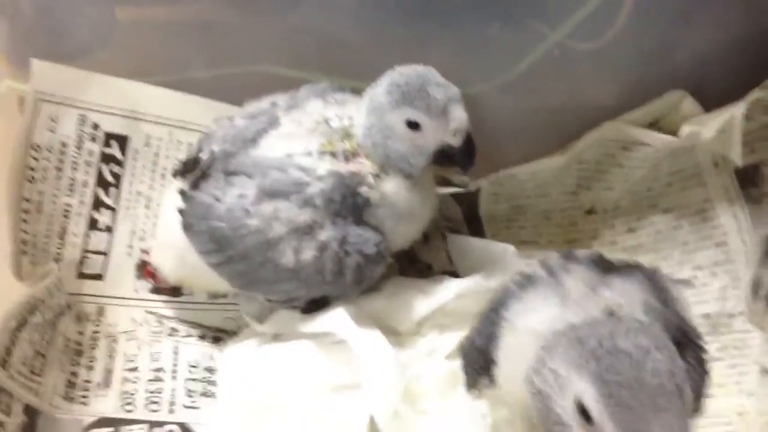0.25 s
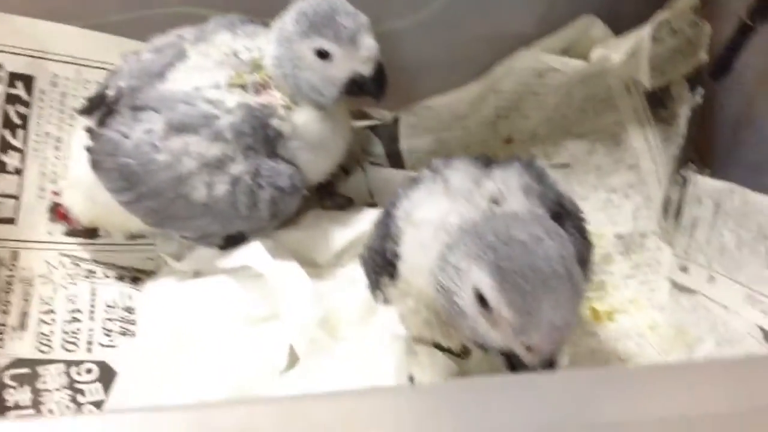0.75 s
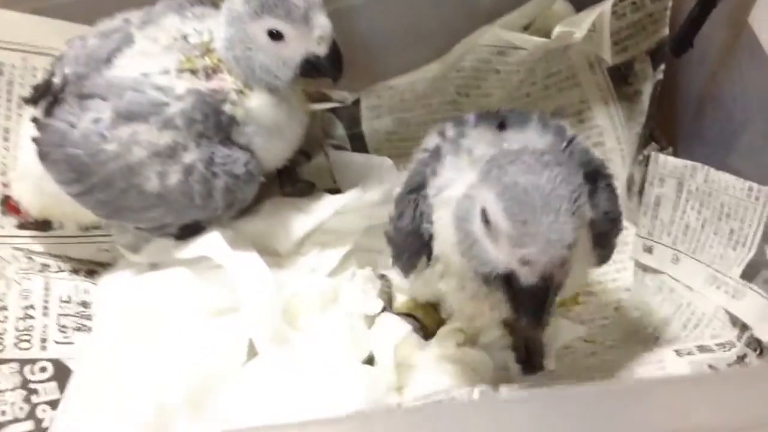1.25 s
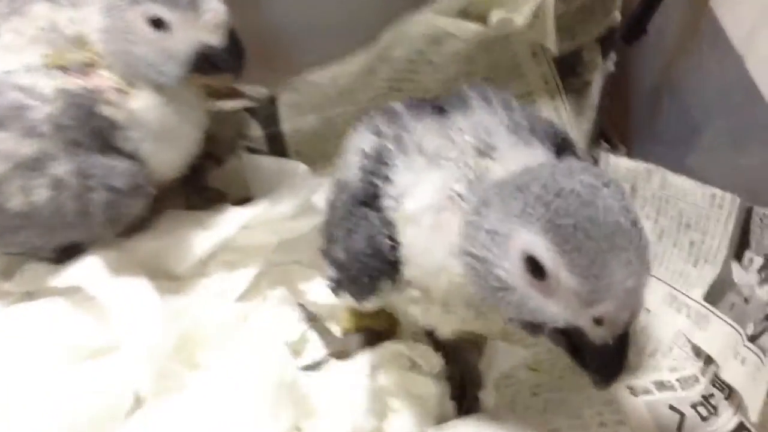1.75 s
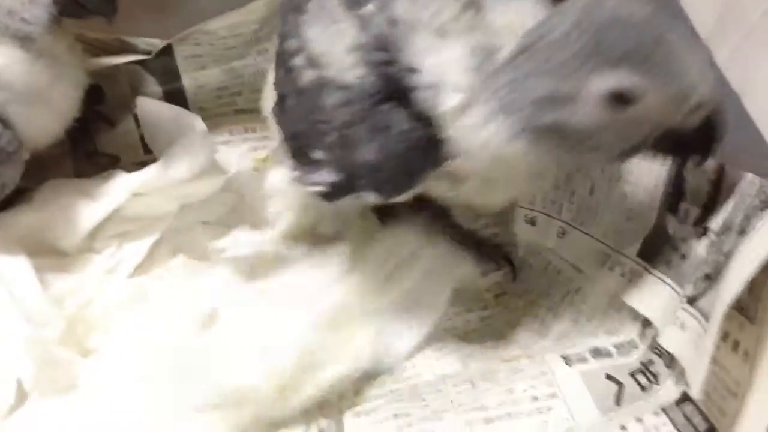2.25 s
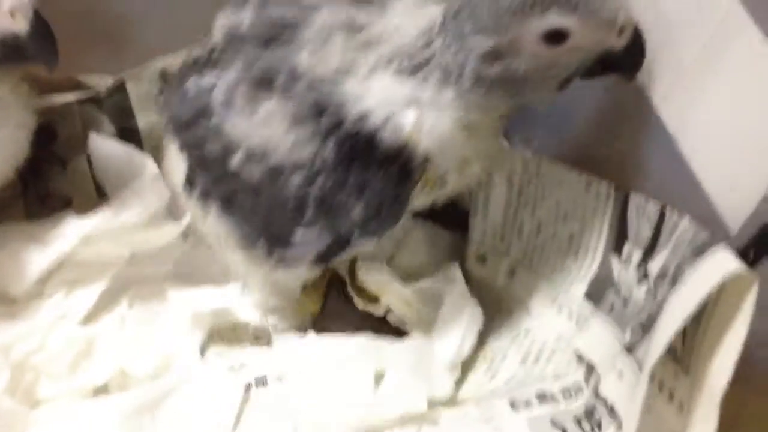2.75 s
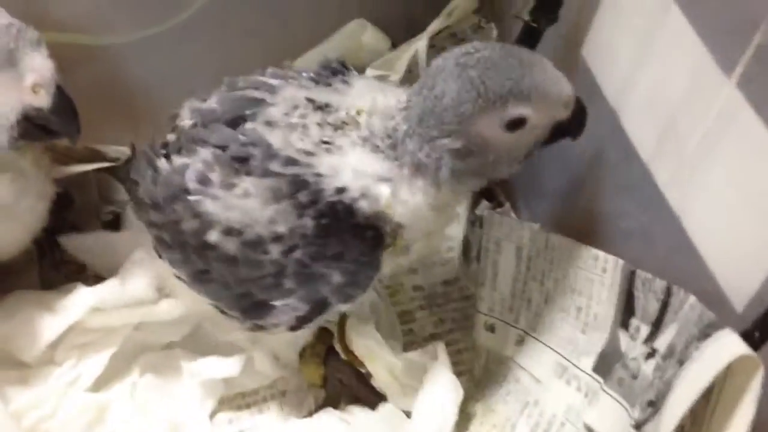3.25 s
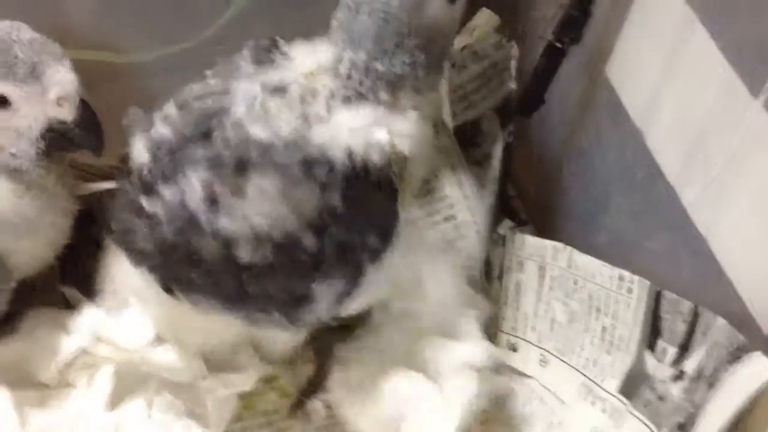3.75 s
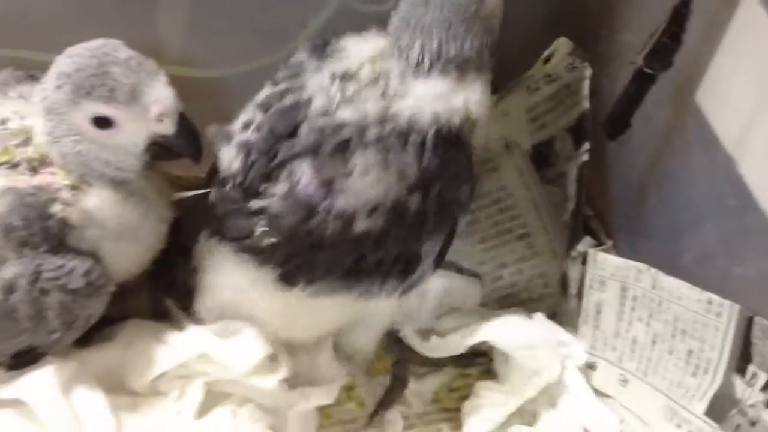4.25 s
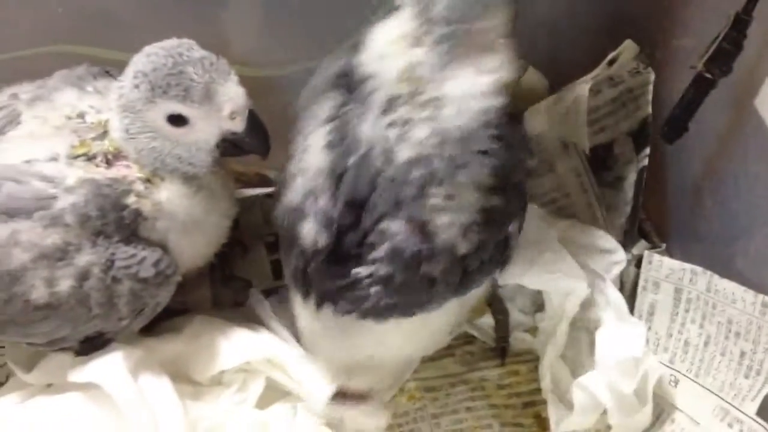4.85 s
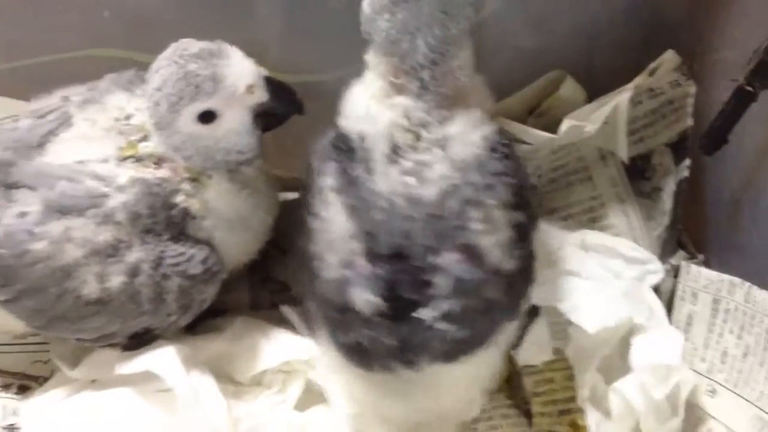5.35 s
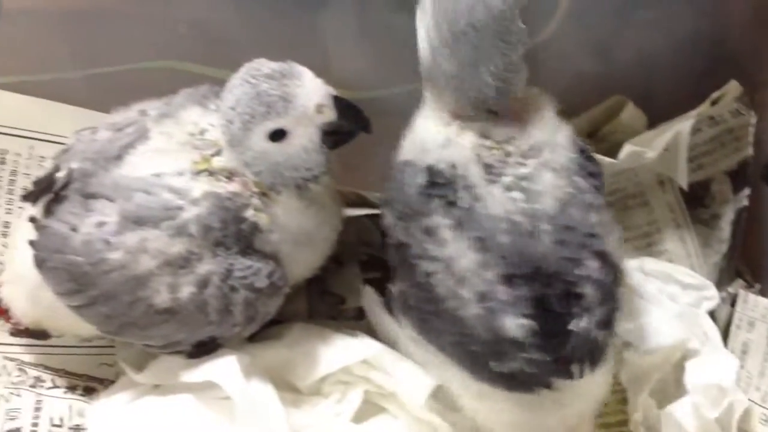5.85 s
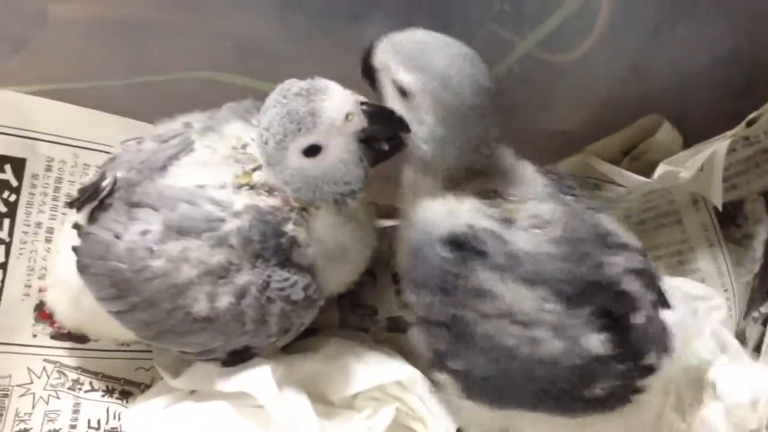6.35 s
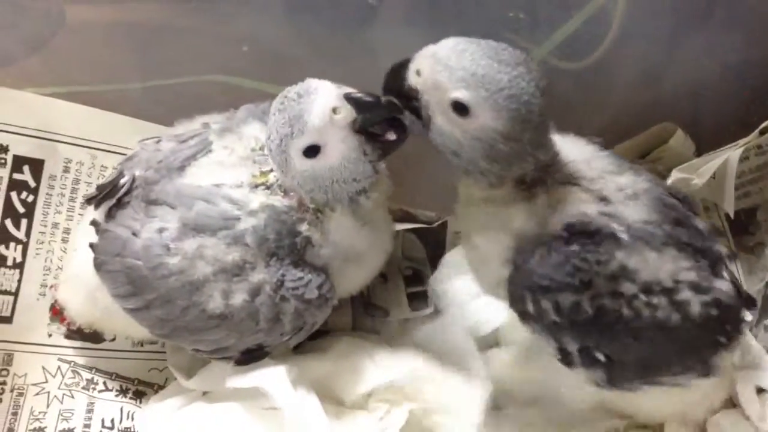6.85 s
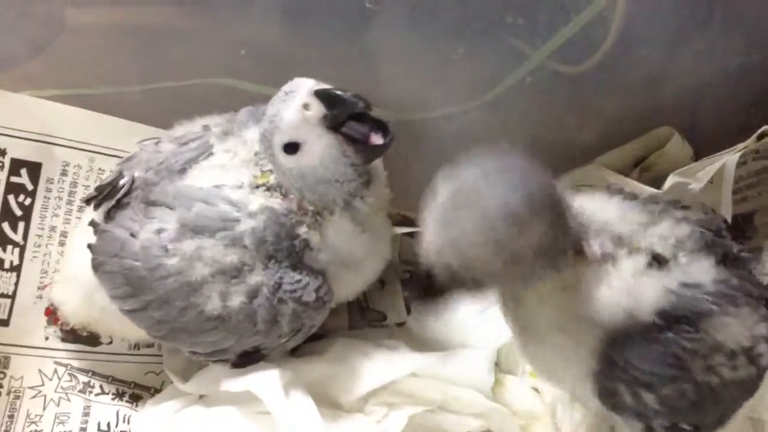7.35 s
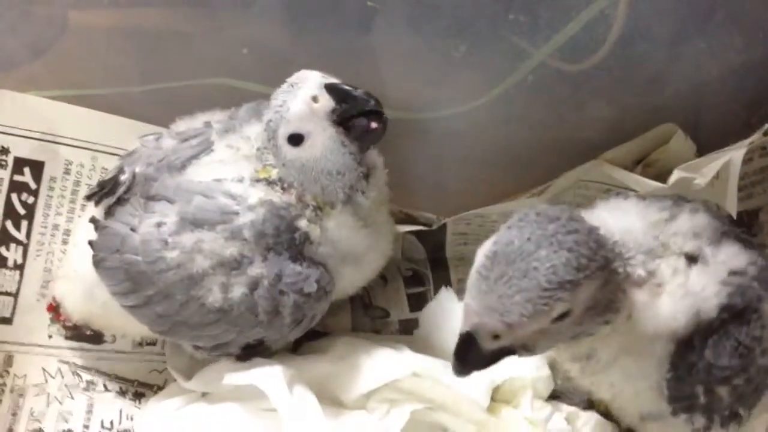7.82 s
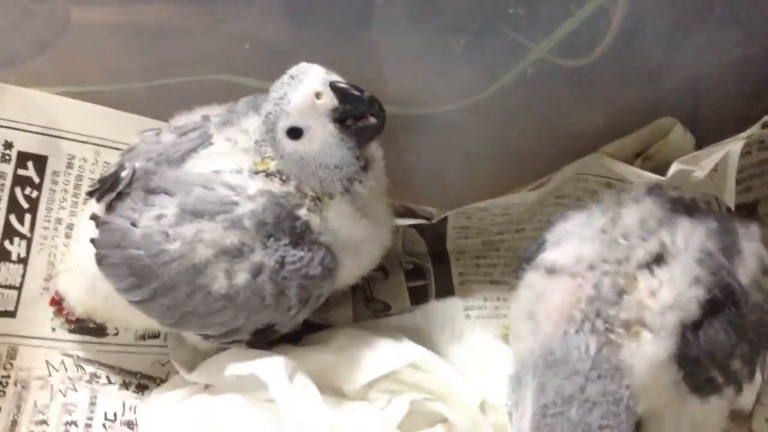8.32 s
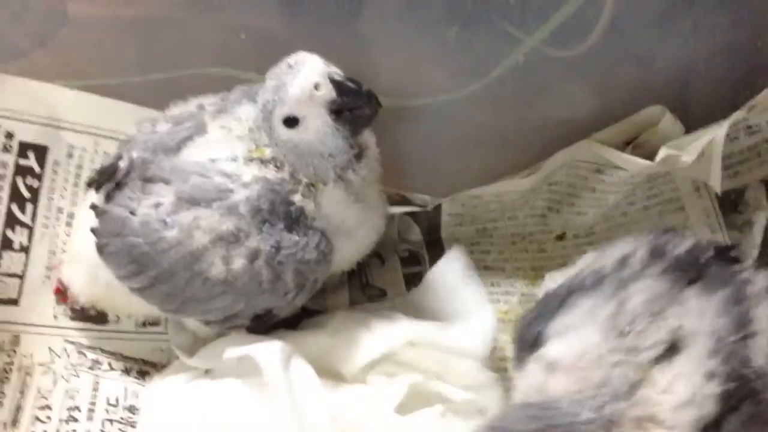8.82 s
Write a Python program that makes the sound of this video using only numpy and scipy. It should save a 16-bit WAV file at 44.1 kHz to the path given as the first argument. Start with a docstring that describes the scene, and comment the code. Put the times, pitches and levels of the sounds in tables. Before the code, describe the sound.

Claws tap, snap and scuff irregularly on newspaper in a plastic box, with soft floor thumps, tissue rustle and a faint low hum.

```python
"""Plastic box in a small room: parrot chicks shuffle over newspaper and tissue.
Claws tap and snap the paper: noise bursts plus a briefly ringing sheet. Feet thump the floor: damped modes.
Feathers and tissue rustle between the steps: tiny slips over smooth friction; dragged claws ring in bands.
Reflections and a short tail surround the chicks; swelling room air and a low, wavering hum lie beneath."""
import sys
import numpy as np
from scipy import signal
from scipy.fft import rfft, irfft
from scipy.io import wavfile

SR = 44100
rng = np.random.default_rng(int(sys.argv[2]) if len(sys.argv) > 2 else 0)


def bounce(signal):
    """Save signal as a 16-bit WAV file at the path given by the first command-line argument."""
    frames = np.transpose(np.atleast_2d(signal))
    limited = np.clip(frames, -1, 1)
    pcm = np.round(limited * 32767).astype(np.int16)
    wavfile.write(sys.argv[1], SR, pcm)


N = 400428
TIME = np.arange(N) / SR
FREQS = np.maximum(np.arange(N // 2 + 1) * SR / N, 1)
CUTOFF_HZ = 15700
SCUFF_BAND_HZ, CRACK_BAND_HZ, TICK_BAND_HZ = (428, 1380), (1497, 4650), (3760, 18500)


def from_db(db):
    """Decibels to gain."""
    return 10 ** (np.asarray(db) / 20)


def rms_one(x):
    """Scale to unit rms."""
    return x / np.sqrt(np.mean(x ** 2) + 1e-20)


def at_hz(points, hz):
    """Read a table on a log-frequency axis."""
    f, value = np.transpose(points)
    return np.interp(np.log(hz), np.log(f), value)


def band(edges_hz, order=8):
    """Gain of a band with smooth edges."""
    low, high = edges_hz
    return 1 / np.sqrt((1 + (low / FREQS) ** order) * (1 + (FREQS / high) ** order))


def shaped(x, gain):
    """Filter a steady signal by a spectral gain; rms 1."""
    return rms_one(irfft(rfft(x) * gain, N))


def drift(rate_hz):
    """Slow random signal with spread 1."""
    return shaped(rng.standard_normal(N), 1 / (1 + (FREQS / rate_hz) ** 2))


def ring(x, hz, t60_s):
    """Damped mode: a unit click starts a cosine of unit height."""
    radius = 10 ** (-3 / (t60_s * SR))
    angle = 2 * np.pi * hz / SR
    return signal.lfilter([.5, 0, -.5], [1, -2 * radius * np.cos(angle), radius * radius], x)


def add(out, start_s, sound):
    """Mix a sound in at a given time."""
    i = int(start_s * SR)
    out[i:i + len(sound)] += sound[:N - i]


# relative spectrum of paper inside the box: (frequency [Hz], density [dB per Hz])
PAPER_SPECTRUM = [(400, 0), (640, 10), (800, 0), (1150, 7), (1550, -1.5), (1900, 1), (2700, -6), (3400, -2),
                  (4100, -10.5), (5200, -16.5), (6700, -8.5), (8400, -3.5), (9800, -14), (15000, -14)]
# narrow peaks and dips from the box walls: (frequency [Hz], width [Hz], gain [dB])
WALL_RESONANCES = [(1105, 70, -6), (2670, 41, 8.5), (3450, 60, -7.5), (6530, 180, 0.5)]


def paper_colour():
    """Gain of the broad paper spectrum with the wall resonances on top."""
    level_db = at_hz(PAPER_SPECTRUM, FREQS)
    for hz, width_hz, gain_db in WALL_RESONANCES:
        level_db = level_db + gain_db / (1 + (2 * (FREQS - hz) / width_hz) ** 2)
    return from_db(level_db)


def paper_noise(edges_hz):
    """Noise with the colour of paper in the box, within one band."""
    return shaped(rng.standard_normal(N), paper_colour() * band(edges_hz))


# a foot or wing sweeps over the bedding; levels precede the band gains in shuffling():
# (start [s], length [s], level [dB], brightness [dB])
SWEEPS = [(0.843, 0.33, -55.5, -3.5), (0.958, 0.044, -48, -0.5), (1.307, 0.14, -64, 0),
          (1.519, 0.17, -54.5, 1.5), (1.87, 0.24, -54.5, 0), (1.965, 0.022, -58, 12), (2.196, 0.14, -53, 4),
          (2.351, 0.086, -40, 0), (2.438, 0.079, -51.5, 0), (2.528, 0.14, -58, -3.5),
          (2.789, 0.13, -50.5, 1.5), (2.937, 0.26, -51, 1), (3.496, 0.098, -58.5, -0.5),
          (3.607, .11, -51, 0), (3.719, 0.069, -52.5, 1), (3.794, 0.14, -60, 1), (3.972, 0.042, -48, -1.5),
          (4.091, 0.068, -54.5, -0.5), (4.338, 0.12, -49.5, 2), (4.465, 0.39, -56.5, -5),
          (4.967, 0.12, -49.5, -4), (5.182, 0.14, -51.5, 0.5), (5.902, 0.16, -57, 0.5),
          (5.968, .022, -48.5, 2), (6.054, .08, -57.5, -1), (6.228, 0.12, -55, 0), (6.658, 0.17, -67, 3),
          (6.864, 0.11, -54.5, 3), (7.122, 0.29, -61, 2), (7.419, 0.14, -56, 1), (7.646, 0.41, -58.5, 2.5),
          (8.058, 0.18, -57, 2.5), (8.328, 0.16, -51.5, 1.5), (8.712, .18, -58.5, 4),
          (8.825, 0.033, -46, -1.5), (9.001, 0.047, -49.5, -2)]
SNAG_EVERY_S, SNAG_SCATTER_DB, SNAG_HZ = 0.05, 2.5, 1000
SNAG_RING_DB, SNAG_CRACK_DB, SNAG_TICK_DB = -0.5, -2.5, -3.5  # re the sweep
TAP_DECAY_S = 0.0049  # up to TAP_DECAY_AT_DB; halves with every DECAY_HALVES_DB above it
TAP_DECAY_AT_DB, DECAY_HALVES_DB = -45.5, 15
SECOND_TOUCH_S = 0.0051
# claw taps and paper snaps: (time [s], ring frequency [Hz], ring level [dB], crack level [dB],
# tick level [dB], second touch re the first [dB])
CLAW_TAPS = [(0.577, 750, -55.5, -63, -80, -16), (0.716, 710, -54, -70, -66, -6),
             (0.982, 1490, -55, -48.5, -47.5, 2.5), (1.0504, 1020, -24.5, -30.5, -41, -4.5),
             (1.557, 980, -47, -64, -65, -16), (1.883, 630, -52.5, -77, -74, 2),
             (1.966, 1000, -45, -64, -52, -12), (2.0186, 587, -15.5, -23.5, -27, -14),
             (2.042, 920, -29.5, -41, -45, -19), (2.3536, 1020, -25.5, -33.5, -50, -15),
             (2.413, 1160, -24.5, -27.5, -28, -2), (2.6405, 3520, -42, -43.5, -57, -19),
             (2.674, 3640, -48.5, -63, -47.5, 2), (2.86, 3000, -37, -58, -44, -4),
             (2.8995, 2840, -40, -56, -54, -14), (3.017, 1340, -57, -37.5, -33, -8.5),
             (3.041, 1100, -56, -41, -50, -4), (3.0856, 1285, -34, -33, -38.5, 12.5),
             (3.095, 630, -25, -34, -46, -26), (3.105, 1090, -33, -32, -47, -23),
             (3.474, 1230, -47, -65, -72, -4), (3.675, 684, -51, -42.5, -54, -25),
             (3.835, 1080, -48, -66, -65, -14), (3.885, 1040, -48.5, -57, -62, -21),
             (4.0354, 1030, -31.5, -31.5, -30.5, -4.5), (4.0432, 1790, -23.5, -34, -33, -24),
             (4.0775, 1260, -45, -38, -43, -31), (4.333, 624, -40.5, -48.5, -67, -24),
             (4.409, 579, -28, -39.5, -45, -2), (4.664, 1110, -47, -64, -57, -10),
             (4.851, 920, -36.5, -33.5, -36.5, -9), (4.868, 1180, -44, -50, -41, -25),
             (4.89, 890, -34, -33.5, -30.5, 9), (4.8932, 6800, -20, -37, -42, -34),
             (5.2559, 630, -39.5, -44.5, -52, -1), (6.0348, 1190, -35, -29.5, -37, -4.5),
             (6.04, 6000, -27.5, -35, -37.5, -36), (6.107, 955, -46, -44, -63, -10),
             (6.123, 8000, -45.5, -59, -64, -27), (6.152, 806, -51, -52, -62, -10),
             (6.198, 8000, -52.5, -53, -54, -24), (6.346, 590, -31, -35, -44.5, -12),
             (6.357, 640, -34, -30.5, -44, -5.5), (6.431, 1160, -50.5, -50, -67, -30),
             (6.956, 1410, -41.5, -50, -47, -1.5), (7.475, 1140, -57, -51, -48, -22),
             (7.544, 575, -50, -55, -49, -19), (7.677, 540, -44.5, -56, -62, -0.5),
             (7.71, 7900, -49, -66, -64, -16), (8.4517, 1120, -29, -35, -38.5, 0),
             (8.832, 1290, -62, -38.5, -43, -5), (9.021, 1170, -48, -38.5, -51, -22)]


def touches(snags_per_sweep=8):
    """Each tap is two touches, harder ones shorter; claws also snag faintly along each sweep."""
    for s, hz, ring_db, crack_db, tick_db, second_db in CLAW_TAPS:
        for lag_s, db in ((0, 0), (SECOND_TOUCH_S, second_db)):
            force_db = max(ring_db, crack_db) + db
            decay_s = TAP_DECAY_S * .5 ** (max(force_db - TAP_DECAY_AT_DB, 0) / DECAY_HALVES_DB)
            yield s + lag_s, hz, ring_db + db, crack_db + db, tick_db + db, decay_s
    sweep_chances = rng.uniform(-1, 1, (len(SWEEPS), snags_per_sweep, 3))
    for (start_s, length_s, level_db, brightness_db), chances in zip(SWEEPS, sweep_chances):
        for k, (when, pitch, size) in enumerate(chances):
            after_s = (k + .5 + when / 2) * SNAG_EVERY_S
            db = level_db + SNAG_SCATTER_DB * size
            if after_s < length_s:
                yield (start_s + after_s, SNAG_HZ * 2 ** (pitch / 2), db + SNAG_RING_DB - brightness_db,
                       db + SNAG_CRACK_DB, db + SNAG_TICK_DB + brightness_db, TAP_DECAY_S / 2)


def taps(rise_s=0.0011, ring_cycles=13, body_cycles=1.96, tick_decay_ratio=0.83, tick_top_hz=10500):
    """Each tap is a burst of buckling fibres; the sheet under the claw rings briefly at its own pitch."""
    out, t = np.zeros(N), TIME[:SR // 25]
    attack = 1 - np.exp(-t / rise_s)
    body = paper_noise((SCUFF_BAND_HZ[0], CUTOFF_HZ))
    crack = paper_noise(CRACK_BAND_HZ)
    tick = shaped(paper_noise(TICK_BAND_HZ), 1 / np.sqrt(1 + (FREQS / tick_top_hz) ** 2))
    for s, hz, ring_db, crack_db, tick_db, decay_s in touches():
        here = (int(s * SR) + np.arange(len(t))) % N
        burst = attack * np.exp(-t / decay_s)
        sheet = ring(signal.unit_impulse(len(t)), hz, ring_cycles / hz) * attack
        body_t60_s = body_cycles / hz
        knock = ring(ring(body[here], hz, body_t60_s), hz, body_t60_s) * burst
        tone = rms_one(rms_one(knock) + rms_one(sheet))
        snap = rms_one(crack[here] * burst)
        edge = rms_one(tick[here] * attack * np.exp(-t / (decay_s * tick_decay_ratio)))
        tap = from_db(ring_db) * tone + from_db(crack_db) * snap + from_db(tick_db) * edge
        # each part's level is its energy spread over 5 ms, as rms
        add(out, s, tap * np.sqrt(SR / 200 / len(t)))
    return out


# box floor: (frequency [Hz], relative level [dB], t60 [s])
FLOOR_MODES = [(129, -14.5, 0.066), (183.3, -9, 0.13), (222.4, 1.5, 0.045), (324.3, 1, 0.062),
               (377, 3.5, 0.023), (473, -0.5, 0.028), (580, 5.5, 0.046), (630, -42, 0.04)]
# weight landing on the floor: (time [s], peak level before level_db [dB], contact time [s])
FOOTSTEPS = [(1.054, -38, 0.0032), (2.0190, -14, 0.00094), (2.025, -20, 0.0024), (2.354, -29, 0.0037),
             (2.419, -30, 0.0026), (3.0875, -16, 0.0014), (3.762, -36, 0.0045), (4.0462, -30.5, 0.0026),
             (4.3340, -40, 0.0019), (4.412, -17, 0.00127), (4.427, -29.5, .0038), (4.8910, -22, 0.0018),
             (5.2570, -28, 0.002), (6.0391, -28.5, 0.001), (6.3509, -10.5, 0.00057), (6.958, -33, 0.0033),
             (7.546, -19.5, 0.0015), (7.6761, -39, 0.0007), (8.177, -28.5, 0.0029), (8.8399, -35.5, 0.0042)]


def steps(level_db=0.5, scatter_db=1.5, radiation_hz=135, rock_db=-30.0):
    """A foot pushes the plastic floor with a half-sine; a soft, long contact favours the low modes."""
    out, t = np.zeros(N), TIME[:SR // 4]
    scatter = rng.standard_normal((len(FOOTSTEPS), len(FLOOR_MODES)))
    # a small panel radiates little bass
    radiation = signal.butter(3, radiation_hz, "high", fs=SR, output="sos")
    for (s, peak_db, contact_s), spot in zip(FOOTSTEPS, scatter):
        force = np.sin(np.pi * np.minimum(t / contact_s, 1))
        push = signal.sosfilt(radiation, force) + from_db(rock_db) * force  # the whole box rocks a little
        thump = np.zeros(len(t))
        for (hz, db, t60_s), own in zip(FLOOR_MODES, spot):
            thump += from_db(db + scatter_db * own) * ring(push, hz, t60_s)
        add(out, s, from_db(peak_db + level_db) * thump / np.abs(thump).max())
    return out


FIDGET_DB = -70  # the chicks never keep quite still
# trodden paper relaxes: level re the tap, amplitude decay time, brightness
SETTLE_DB, SETTLE_S, SETTLE_BRIGHTNESS_DB = -13.5, 0.013, -2
# share of its length at which a sweep is loudest; exponent of its arch; drop at start and end
SWEEP_CREST, SWEEP_ROUNDNESS, SWEEP_EDGE_DB = 0.61, 1.5, 9


def friction(tapping, lean):
    """Rubbing level [dB] of fidgets, sweeps and settling; brightness tilts low (-1) against high (+1)."""
    keep = np.exp(-2 / (SETTLE_S * SR))
    settling = signal.lfilter([1 - keep], [1, -keep], tapping ** 2 + 1e-18)
    power = from_db(FIDGET_DB) ** 2 + settling * from_db(SETTLE_DB + lean * SETTLE_BRIGHTNESS_DB) ** 2
    for start_s, length_s, db, brightness_db in SWEEPS:
        progress = np.arange(-1, 2, 1 / (length_s * SR))
        before = (SWEEP_CREST - progress) / SWEEP_CREST
        after = (progress - SWEEP_CREST) / (1 - SWEEP_CREST)
        drop_db = SWEEP_EDGE_DB * np.maximum(before, after) ** SWEEP_ROUNDNESS
        add(power, start_s - length_s, from_db(db + lean * brightness_db - drop_db) ** 2)
    return 10 * np.log10(power)


def grains(edges_hz, per_s, size_db, cycles, count=10):
    """Fibres let go at random; each pings for a few cycles at one of several pitches."""
    sizes = from_db(size_db * np.minimum(rng.exponential(1, N), 3)) * rng.choice([-1, 1], N)
    clicks = sizes * (rng.random(N) < per_s / SR)
    dealt = rng.integers(0, count, N)
    pitches = np.minimum(np.geomspace(*edges_hz, count), CUTOFF_HZ)
    faint = 1e-12 * rng.standard_normal(N)
    pings = np.zeros(N)
    for k, hz in enumerate(pitches):
        pings += hz ** .5 * ring(clicks * (dealt == k) + faint, hz, cycles / hz)
    return rms_one(pings)


def rustle(level_db, edges_hz, grains_per_s, size_db, cycles, smooth, flutter_db):
    """Tiny slips of uneven size over smooth friction, bunched as the contact catches and lets go."""
    slips = shaped(grains(edges_hz, grains_per_s, size_db, cycles), paper_colour() * band(edges_hz))
    rubbing = slips + smooth * paper_noise(edges_hz)
    return from_db(level_db) * rms_one(rubbing * from_db(flutter_db * drift(89)))


SCRAPE_DB, CRINKLE_DB, SWISH_DB = -6.5, -0.6, -0.7
CATCH_DB, CATCH_HZ = 0.72, 21.9  # the bedding catches and lets go unevenly


def shuffling(tapping):
    """Claws scuff, newspaper crinkles, feathers brush the tissue: slips over smooth friction."""
    catching_db = CATCH_DB * drift(CATCH_HZ)
    scrape_db, crinkle_db, swish_db = [friction(tapping, lean) + catching_db for lean in (-1, 0, 1)]
    scrape = rustle(scrape_db + SCRAPE_DB, SCUFF_BAND_HZ, grains_per_s=230, size_db=3.0,
                    cycles=9.1, smooth=0.87, flutter_db=1.5)
    crinkle = rustle(crinkle_db + CRINKLE_DB, CRACK_BAND_HZ, grains_per_s=300, size_db=2.5,
                     cycles=31, smooth=1.38, flutter_db=1.0)
    swish = rustle(swish_db + SWISH_DB, TICK_BAND_HZ, grains_per_s=300, size_db=4.0,
                   cycles=30, smooth=2.5, flutter_db=1.5)
    return scrape + crinkle + swish


# claws dragged across paper; an end before the loudest point cuts the drag off there:
# (start [s], loudest [s], end [s], centre [Hz], width [Hz], level [dB])
CLAW_DRAGS = [(0.963, 0.97, 1.06, 2300, 3020, -54), (0.93, .98, 0.97, 880, 500, -50.5),
              (1.525, 1.546, 1.9, 1000, 300, -61), (1.963, 1.96, 1.99, 1020, 150, -47.5),
              (2.771, 2.85, 2.87, 3200, 750, -47.5), (2.87, 2.892, 2.93, 3230, 600, -48),
              (4.623, 4.68, 4.85, 1140, 250, -61), (4.982, 5.06, 5.08, 490, 420, -45),
              (6.34, 6.37, 5.5, 586, 130, -61)]


def drags(chatter_db=3.0, chatter_hz=220):
    """A dragged claw sticks and slips; the patch of paper under it rings in one band."""
    out, chatter = np.zeros(N), from_db(chatter_db * drift(chatter_hz))
    slips = rng.standard_normal(N) * chatter
    for start_s, loudest_s, end_s, hz, width_hz, db in CLAW_DRAGS:
        pressure = np.interp(TIME, [start_s, loudest_s, end_s], [0, 1, 0])
        patch = 1 / (1 + ((FREQS - hz) / width_hz) ** 2 * 2)
        out += from_db(db) * np.sqrt(pressure) * shaped(slips, patch)
    return out


# room decay: (frequency [Hz], t60 [s])
ROOM_DECAY = [(150, 0.11), (600, 0.23), (2000, 0.23), (8000, 0.19), (16000, .13)]


def room(x, wet_db=-14.5, bass_db=4.5, build_up_s=0.0045, early_db=-28.0, early_decay_s=0.0024):
    """Quick reflections between the box walls, then the room's tail, longest in the mid range."""
    t, response = TIME[:SR // 2], 0
    edges = np.geomspace(90, 18000, 9)
    for low, high in zip(edges, edges[1:]):
        hz = np.sqrt(low * high)
        bandpass = signal.butter(2, [low, high], "band", fs=SR, output="sos")
        noise = signal.sosfilt(bandpass, rng.standard_normal(len(t)))
        tail = (1 - np.exp(-t / build_up_s)) * np.exp(-np.log(1000) * t / at_hz(ROOM_DECAY, hz))
        # long waves pass through the thin walls
        early = t * np.exp(-t / early_decay_s * 2) * (hz > 600)
        share = np.sqrt((high - low) / (SR / 2) / len(t))
        late_part = from_db(wet_db + bass_db * np.log10(1000 / hz)) * rms_one(noise * tail)
        early_part = from_db(early_db) * rms_one(noise * early)
        response = response + share * (late_part + early_part)
    return signal.fftconvolve(x, response)[:N]


AIR_DB = -58.5
HUM_HZ, HUM_DB = 106, -63
# relative spectrum of room air: (frequency [Hz], density [dB per Hz])
AIR_SPECTRUM = [(30, -12), (78, -22), (100, -5.5), (125, 0), (155, -2.5), (210, -0.5), (300, -5.5),
                (450, -14), (680, -14), (1700, -17.5), (3500, -26.5), (5200, -30), (8200, -32),
                (10000, -38), (15500, -32)]


def background(waver=0.48, wander_rad=0.5, rumble_hz=350):
    """Room air whose rumble swells and sinks, and a low hum wavering in level and phase."""
    air = from_db(AIR_DB) * shaped(rng.standard_normal(N), from_db(at_hz(AIR_SPECTRUM, FREQS)))
    rumble = irfft(rfft(air) / (1 + (FREQS / rumble_hz) ** 4), N)
    hum = (1 + waver * drift(12.0)) * np.sin(2 * np.pi * HUM_HZ * TIME + wander_rad * drift(9))
    swell = from_db(1.2 * drift(7))
    return air - rumble + rumble * swell + from_db(HUM_DB) * rms_one(hum)


def scene():
    """The chicks in their box, in the room; the paper settles after every tap."""
    tapping = taps()
    chicks = tapping + steps() + shuffling(tapping) + drags()
    return (chicks + room(chicks) + background())[None]


def record(dry):
    """The microphone sheds the deep bass; the top is cut."""
    lean = signal.sosfilt(signal.butter(2, 70, "high", fs=SR, output="sos"), dry)
    return signal.sosfilt(signal.ellip(10, .2, 70, CUTOFF_HZ, fs=SR, output="sos"), lean)


dry = scene()
out = record(dry)
bounce(out)
```